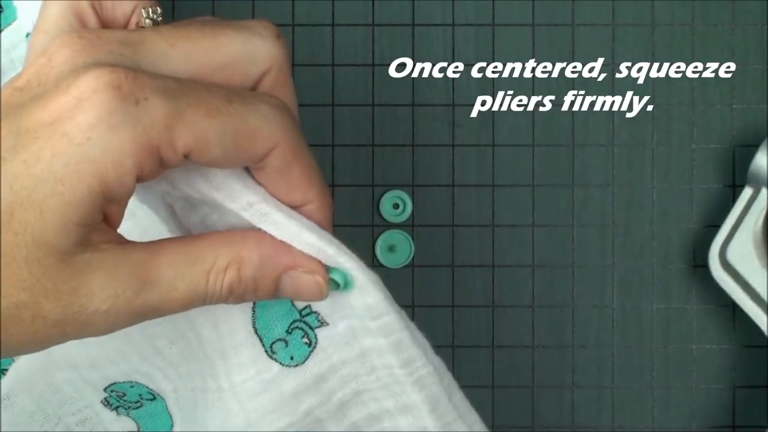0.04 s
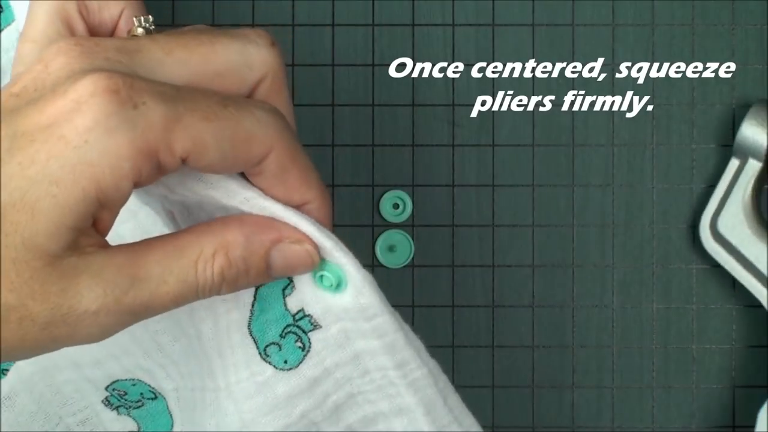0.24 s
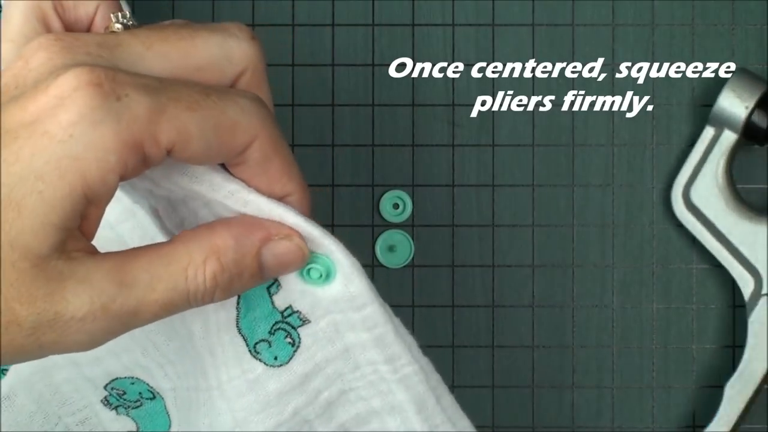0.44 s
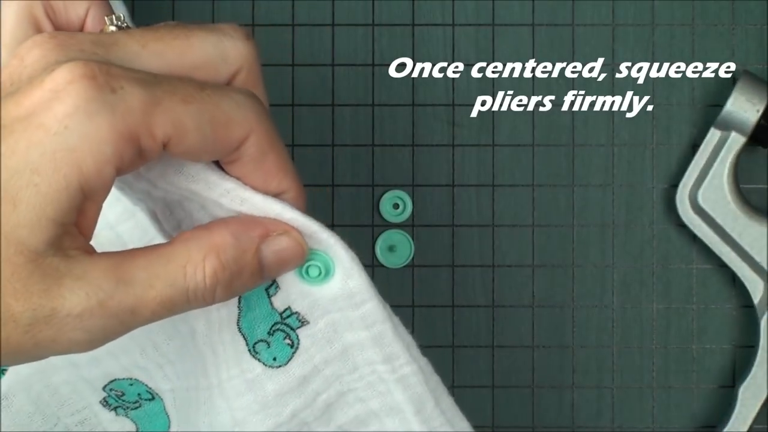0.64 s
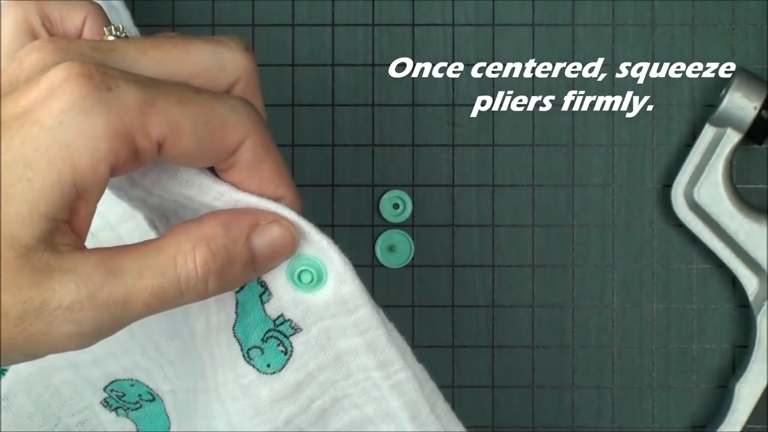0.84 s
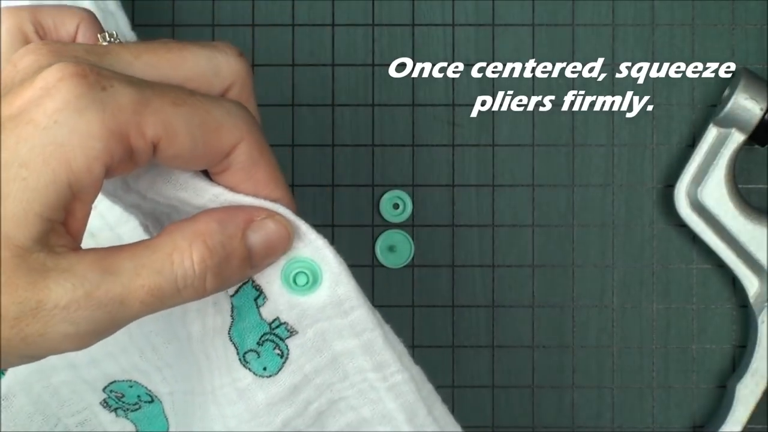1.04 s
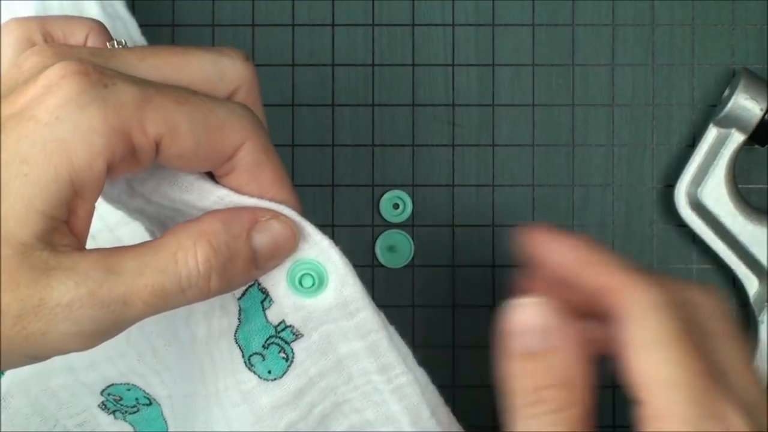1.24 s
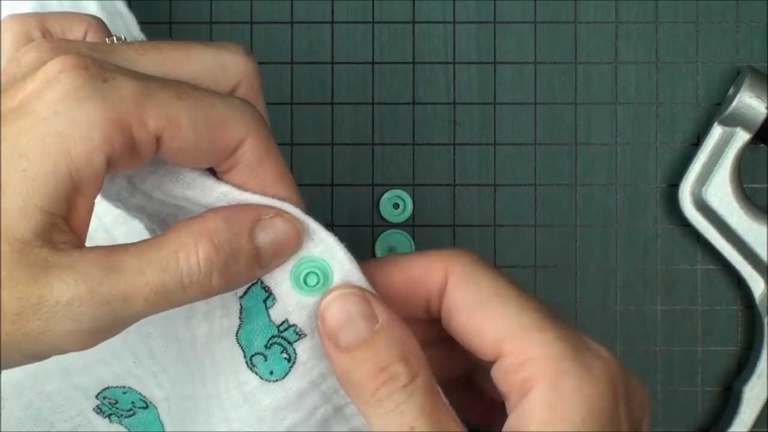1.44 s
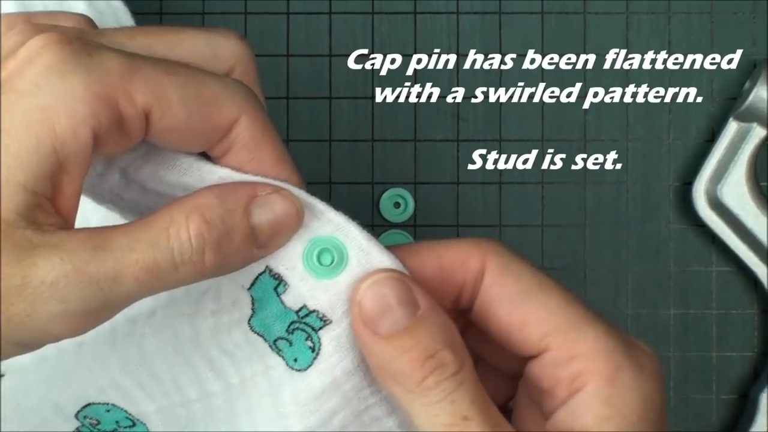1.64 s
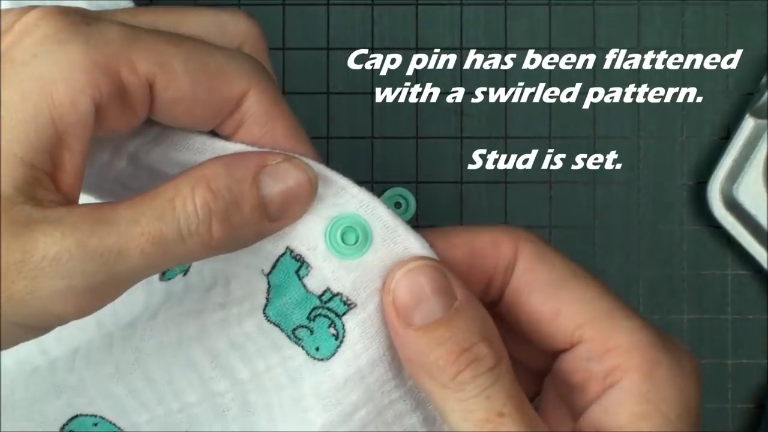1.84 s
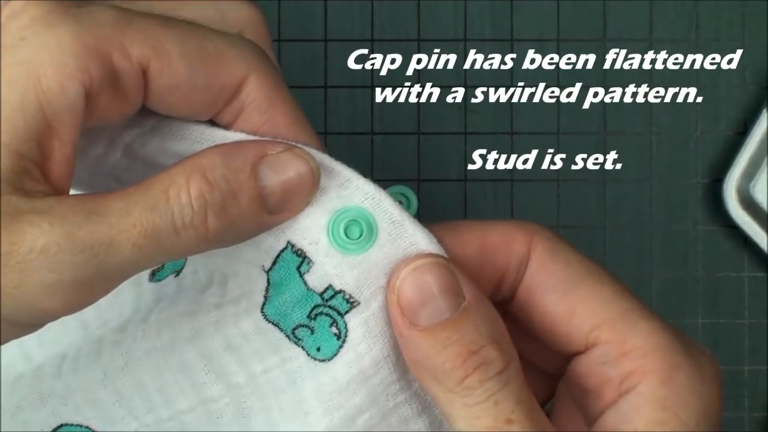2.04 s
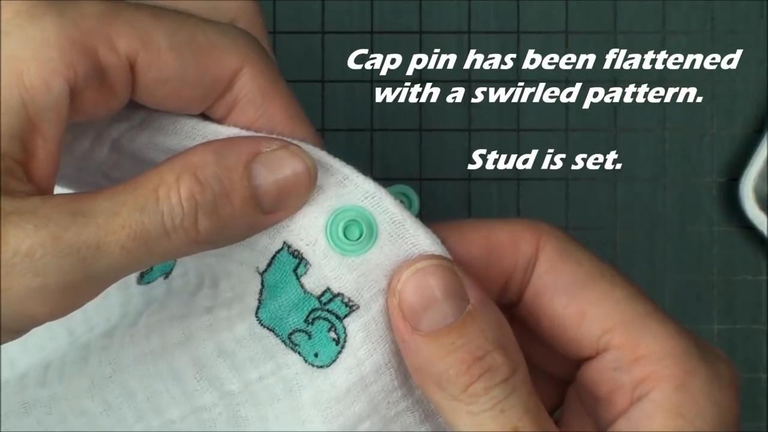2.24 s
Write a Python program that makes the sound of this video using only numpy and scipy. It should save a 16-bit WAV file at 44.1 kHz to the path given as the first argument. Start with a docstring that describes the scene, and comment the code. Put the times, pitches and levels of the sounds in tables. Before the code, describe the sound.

Metal pliers are set down on a cutting mat: a dull thump, a brief scrape, then a sharp clack as they drop flat and rock. A few soft knocks follow, close by in a small room with faint hiss.

```python
"""A dull thump over faint hiss and hum: one end of metal snap pliers lands on a cutting mat on a desk,
close to the microphone in a small room. The metal scrapes briefly in tiny slips, then the tool drops
flat with a clack and rocks. A few soft knocks follow. Each blow rings the desk and the pliers.
The recorder's gain control ducks the hiss and the low hum at the clack."""
import sys
import numpy as np
from scipy import signal
from scipy.fft import rfft, irfft, next_fast_len
from scipy.io import wavfile
from scipy.ndimage import uniform_filter1d, map_coordinates

SR = 44100
rng = np.random.default_rng(int(sys.argv[2]) if len(sys.argv) > 2 else 0)


def digitize_waveform(pressure):
    """Quantize a signal to 16-bit integers and store it at the path in sys.argv[1].

    Rows of a 2-D input are taken as channels; values are limited to [-1, 1].
    """
    field = np.atleast_2d(pressure).T
    bounded = np.clip(field, -1, 1)
    quanta = np.round(bounded * 32767).astype(np.int16)
    wavfile.write(sys.argv[1], SR, quanta)


N = 101429


def amp(db):
    """Decibels to gain."""
    return 10 ** (np.asarray(db) / 20)


def unit(x):
    """Scale to rms 1."""
    return x / np.sqrt(np.mean(x ** 2) + 1e-20)


def along(points, hz):
    """Interpolate (Hz, value) points on a log frequency axis."""
    point_hz, values = np.transpose(points)
    return np.interp(np.log(hz + 1), np.log(point_hz + 1), values)


def filtered(x, response):
    """Filter x by response(hz)."""
    n = x.shape[-1]
    n_fft = next_fast_len(n + SR // 2)
    hz = np.fft.rfftfreq(n_fft, 1 / SR)
    return irfft(rfft(x, n_fft) * response(hz), n_fft)[..., :n]


def causal(gain):
    """Minimum-phase response with this gain: no sound ahead of the strike."""
    cepstrum = irfft(np.log(np.maximum(gain, 1e-6)))
    half = len(cepstrum) // 2
    folded = np.concatenate([cepstrum[:1], 2 * cepstrum[1:half], np.zeros(half)])
    return np.exp(rfft(folded))


def add(track, start_s, sound):
    """Mix a sound into a track."""
    part = track[round(start_s * SR):][:len(sound)]
    part += sound[:len(part)]


def spread(pair, width):
    """Two unrelated signals as mid and side of a stereo pair."""
    mid, side = pair[0], width * pair[1]
    return np.array([mid + side, mid - side]) / np.sqrt(1 + width ** 2)


def pan(left_minus_right_db):
    """Left and right gains."""
    return amp(np.array([[0.5], [-0.5]]) * left_minus_right_db)


def fade(t, t60_s):
    """Exponential decay, 60 dB in t60_s."""
    return np.exp(-np.log(1000) * t / t60_s)


def stereo_noise(colour, width):
    """Noise of rms 1, shaped by (Hz, dB) points."""
    noise = filtered(rng.standard_normal((2, N)), lambda hz: amp(along(colour, hz)))
    return unit(spread(noise, width))


def background():
    """Low room tone, a wavering hum and microphone hiss."""
    # Each row: frequency in Hz, spectral level in dB.
    tone_colour = [(25, -16), (45, -17), (72, 1), (120, -2.5), (190, -3), (280, 0.5), (450, -5.5),
                   (800, -11.5), (1500, -19.5), (3000, -33), (8000, -33.5)]
    hiss_colour = [(100, 2), (1500, 2), (4000, 0.5), (8000, -0.5), (12000, -1.5), (15500, -1)]
    hum_hz, waver_points_per_s = 260, 10
    t = np.arange(N) / SR
    waver_db = 2.5 * map_coordinates(rng.standard_normal(64), [t * waver_points_per_s], mode="mirror")
    hum = amp(-64 + waver_db) * np.sqrt(2) * np.sin(2 * np.pi * hum_hz * t)
    tone = amp(-63) * stereo_noise(tone_colour, width=0.46)
    hiss = amp(-64) * stereo_noise(hiss_colour, width=0.94)
    return pan(-1.3) * tone + pan(-4) * hum + hiss


def room(x):
    """Small-room reverb: a short diffuse tail whose treble dies first."""
    # Each row: frequency in Hz, t60 in seconds, level in dB.
    bands = [(150, 0.86, -5.5), (406.3, 0.31, -0.5), (995, 0.33, -1), (2150, 0.33, 2), (3913, 0.33, 0),
             (8000, 0.2, 2.5), (14870, .2, 3)]
    delay_s = 0.008
    hz, t, spectra = signal.stft(rng.standard_normal((2, SR // 2)), SR, nperseg=256)
    t60_s = along([(f, t60) for f, t60, _ in bands], hz)[:, None]
    level_db = along([(f, db) for f, _, db in bands], hz)[:, None]
    _, tail = signal.istft(spectra * amp(level_db) * fade(t, t60_s), SR, nperseg=256)
    tail = spread(tail, width=0.65)
    tail /= np.linalg.norm(tail[0])
    tail = np.pad(tail, ((0, 0), (round(delay_s * SR), 0)))
    return signal.fftconvolve(x[None], tail, axes=1)[:, :N]


def metal(hz):
    """Response of the jaws: broad metal-on-metal brightness with a few resonances."""
    # Each row: frequency in Hz, spectral level in dB.
    colour = [(100, -33.5), (300, -17.5), (1200, -1), (2500, -6), (4000, -3), (6500, -7.5), (8000, -5),
              (11000, -9.5), (15500, -13)]
    # Each row: centre in Hz, width in Hz, level in dB.
    resonances = [(3644, 134, 10), (4215, 120, 7.5), (5080, 184, -4.5), (5480, 240, 18.5), (6590, 400, 0.5),
                  (10410, 301.6, -3)]
    peaks = sum(amp(db) * 1j * hz * width_hz / (centre_hz ** 2 - hz ** 2 + 1j * hz * width_hz)
                for centre_hz, width_hz, db in resonances)
    return causal(amp(along(colour, hz))) * (1 + peaks)


def swell(peak_s, peak_db, rise_db_per_s, fall_db_per_s):
    """Envelope that rises and falls linearly in dB."""
    t = np.arange(N) / SR
    return amp(peak_db - np.maximum(rise_db_per_s * (peak_s - t), fall_db_per_s * (t - peak_s)))


def scrape():
    """Tiny slips excite the jaws and the desk: a quick swell, then a weaker slide as the tool drops."""
    # Drag heard through the desk. Each row: frequency in Hz, spectral level in dB.
    drag_colour = [(60, -35), (150, -24), (250, 11.5), (450, -7.5), (630, 3.5), (700, -1), (782, 10.5),
                   (900, -12.5), (1400, -19.5), (2200, -14), (5000, -57.5)]
    slips_per_s = 12000
    slips = np.sign(rng.standard_normal(N)) * (rng.random(N) < slips_per_s / SR)
    burst = swell(peak_s=0.4034, peak_db=-31, rise_db_per_s=3006, fall_db_per_s=3204)
    slide = swell(peak_s=0.4086, peak_db=-48, rise_db_per_s=849.5, fall_db_per_s=420.5)
    jaws = filtered(slips * (burst + slide), metal) / np.std(filtered(slips, metal))
    drag = unit(filtered(slips, lambda hz: amp(along(drag_colour, hz))))
    drag *= swell(peak_s=0.4015, peak_db=-33, rise_db_per_s=1101, fall_db_per_s=452)
    return jaws + drag


def contact(low_hz, high_hz, slope_db_per_octave):
    """The band that a contact drives: heavy ones reach lower, hard ones higher."""
    exponent = slope_db_per_octave / (10 * np.log10(2))
    bass_limit_hz = 125  # the desk radiates little below this

    def band(hz):
        radiated = 1 / (1 + (bass_limit_hz / (hz + 1)) ** 4)
        low_cut = 1 + (low_hz / (hz + 1)) ** exponent
        high_cut = 1 + (hz / high_hz) ** exponent
        return radiated / np.sqrt(low_cut * high_cut)
    return band


def thud(t, band):
    """One push, then dense short modes as decaying noise, both within the contact's band."""
    attack_s, push_db = 0.0007, -12
    envelope = fade(t, t60_s=0.096) * (1 - np.exp(-t / attack_s))
    force = rng.standard_normal(len(t)) * envelope
    force[0] += amp(push_db) * np.linalg.norm(envelope)
    body = filtered(force, lambda hz: causal(band(hz)))
    return unit(body) * np.sqrt(np.mean(envelope ** 2))


def tick(t):
    """Metal touches metal: a short noise burst coloured by the jaws."""
    return unit(filtered(rng.standard_normal(len(t)), metal)) * fade(t, t60_s=0.056)


def ring(modes, t, band):
    """Damped modes, driven as far as the contact's band reaches them, with levels varying per blow."""
    attack_s, scatter_db = 0.00043, 0.87
    tones = np.zeros(len(t))
    for k, (hz, db, t60_s) in enumerate(modes):
        gain = band(hz) * amp(db - scatter_db * rng.standard_normal())
        tones += (-1) ** k * gain * fade(t, t60_s) * np.sin(2 * np.pi * hz * t)
    return tones * (1 - np.exp(-t / attack_s))


def blows():
    """Each blow on the mat gives a thud and a tick, and rings the desk and the pliers."""
    # Each row: start in seconds, levels of desk ring, pliers ring and thud in dB,
    # low and high band edges in Hz, edge slope in dB per octave, tick level in dB.
    hits = [(0.2393, -30.5, -42, -32.5, 218, 1010, 19.5, -66),
            (0.4279, -26.5, -19.5, -18.5, 210, 1954, 24.5, -33),
            (0.4404, -39, -52, -30.5, 720, 2025, 26.5, -45), (0.458, -27, -70, -23, 228, 1150, 17, -42),
            (0.7532, -53, -82.5, -49, 220, 379, 19.5, -77), (0.772, -62.5, -76, -51.5, 323, 484, 19, -97),
            (0.785, -57.5, -53, -47, 240, 636, 19.5, -91), (0.9353, -36, -44.5, -37.5, 577, 1190, 17, -67),
            (1.0162, -56, -81, -41, 310.5, 433, 20.5, -94)]
    # Desk under the mat, pliers lying on it. Each row: frequency in Hz, level in dB, t60 in seconds.
    desk_modes = [(147.3, -7, .42), (254, -2.5, 0.12), (284.5, -3, 0.22), (321.8, 3, 0.14),
                  (368.4, -1.5, 0.11), (456, -13.5, 0.076), (595.6, -5.5, .15), (676, -11, 0.077),
                  (786, -2, 0.15), (830, -3.5, .08), (888, -2, .13), (1250, -4.5, .12), (1349, 0.5, 0.068)]
    pliers_modes = [(564.8, 2, 0.13), (688, -6, 0.1), (1025, 0.5, 0.15), (1115, -9.5, 0.13),
                    (1195, -0.5, .15), (1288, -5, 0.14), (1432.4, -3.5, 0.18), (1543, -10.5, .14),
                    (1625, -10, .12), (1704, -10.5, .22), (1856, -11, .13), (2080, -10.5, .1),
                    (2480, -12, .11), (2788, -9, .14)]
    track = np.zeros(N)
    t = np.arange(SR // 2) / SR
    for start_s, desk_db, pliers_db, thud_db, low_hz, high_hz, slope_db_per_octave, tick_db in hits:
        band = contact(low_hz, high_hz, slope_db_per_octave)
        impact = amp(thud_db) * thud(t, band) + amp(tick_db) * tick(t)
        desk = amp(desk_db) * ring(desk_modes, t, band)
        pliers = amp(pliers_db) * ring(pliers_modes, t, band)
        add(track, start_s, impact + desk + pliers)
    return track


def scene():
    """The pliers in the middle, the room around them."""
    tool = blows() + scrape()
    return tool + amp(-7.5) * room(tool) + background()


def record(dry):
    """Gain control that ducks fast and recovers slowly, then the band limit."""
    threshold_db, recovery_db_per_s = -25.5, 2
    window_s, attack_s = 0.0111, 0.0027
    top_hz = 15780
    power = np.abs(uniform_filter1d(np.mean(dry ** 2, axis=0), round(window_s * SR)))
    excess_db = np.maximum(10 * np.log10(power + 1e-20) - threshold_db, 0)
    recovery_db = recovery_db_per_s * np.arange(N) / SR
    duck_db = np.maximum.accumulate(excess_db + recovery_db) - recovery_db  # leaky peak hold
    duck_db = uniform_filter1d(duck_db, round(attack_s * SR))
    return filtered(dry * amp(-duck_db), lambda hz: hz < top_hz)


dry = scene()
out = record(dry)
digitize_waveform(out)
```